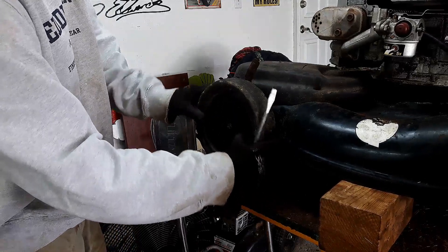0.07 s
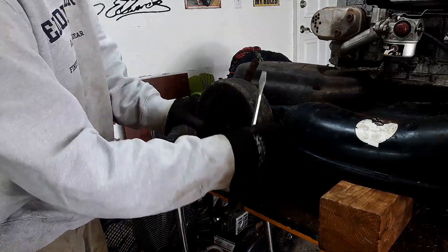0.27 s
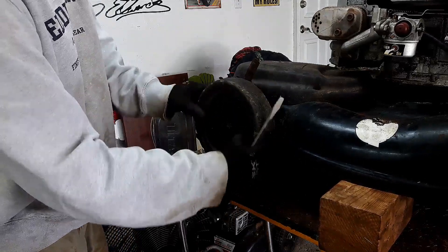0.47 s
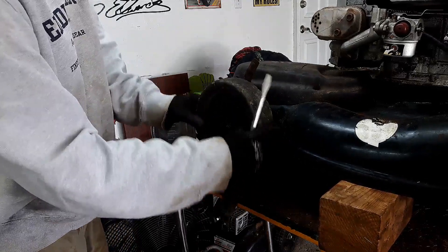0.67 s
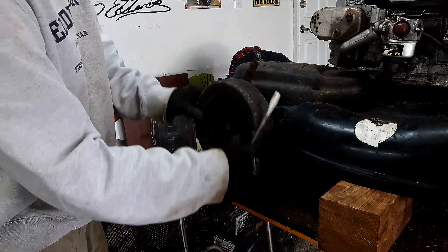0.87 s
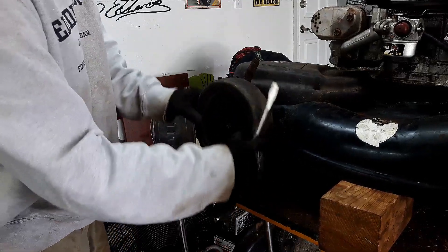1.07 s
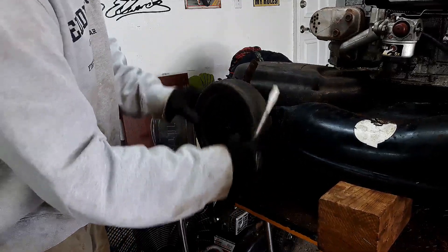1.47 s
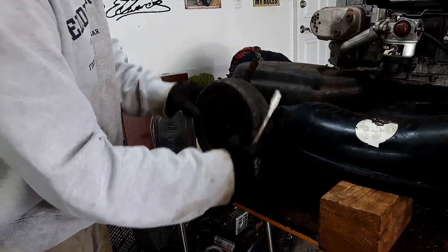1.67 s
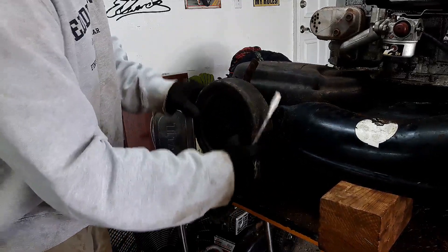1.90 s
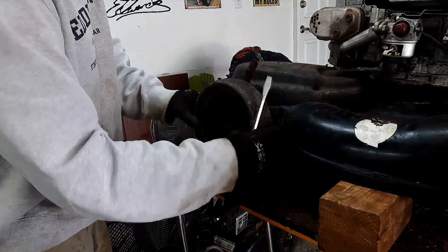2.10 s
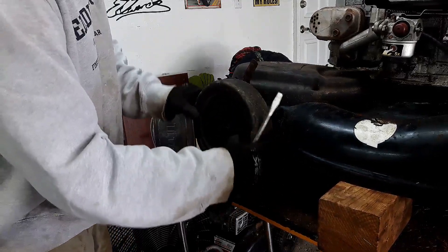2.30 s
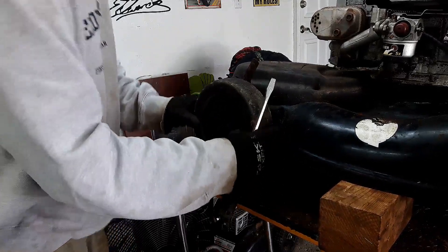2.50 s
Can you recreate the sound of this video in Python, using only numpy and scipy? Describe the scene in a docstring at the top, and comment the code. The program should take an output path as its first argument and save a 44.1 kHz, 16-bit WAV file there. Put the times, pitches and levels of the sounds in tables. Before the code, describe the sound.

A small lawnmower wheel squeaks and knocks as it is worked back and forth in a small workshop. Very short, high squeaks come irregularly from 0.2 to 2.5 seconds over a low rolling rumble. The loose hub clacks and thuds against the hollow body throughout, hardest around 0.5, 0.8, 1.6, 1.8 and 2 seconds. From about 1.4 seconds, the bearing adds faint, thin whistles.

```python
"""A small lawnmower wheel squeaks on its dry axle as a hand works it to and fro on a workbench.
The axle sticks and slips, making short scoops of pitch. The loose hub hits its stop with a clack
and shakes the mower's hollow body, the deck. The wheel rumbles in between, and later its bearing
adds a faint whistle. All this is heard almost in mono, in a small workshop with hard walls."""
import sys
import numpy as np
from scipy import signal
from scipy.fft import rfft, irfft, next_fast_len
from scipy.io import wavfile
from scipy.ndimage import map_coordinates

SR = 44100
rng = np.random.default_rng(int(sys.argv[2]) if len(sys.argv) > 2 else 0)


def materialize(psi):
    """Save the field psi as 16-bit PCM at rate SR to the path in sys.argv[1].

    A 1-D psi becomes a single channel; in a 2-D psi each row is a channel.
    """
    bounded = np.clip(np.atleast_2d(psi).T, -1, 1)
    quanta = np.round(bounded * 32767).astype(np.int16)
    wavfile.write(sys.argv[1], SR, quanta)


N = 116865

# Axle squeaks, each gliding through a turning point: (time [s], length [s], place of the turn [0-1],
# start pitch [Hz], turn pitch [Hz], end pitch [Hz], level [dB], swell [dB], overtone boost [dB])
AXLE_SQUEAKS = [ (.166, .024, .45, 4500, 4280, 4000, -51, -5, 0),
                (.197, .016, .45, 4350, 4380, 5500, -41, -4, -4),
                (.432, .064, .45, 5450, 4850, 5650, -36, 13, 3),
                (.450, .044, .4, 4800, 4270, 4650, -38, 0, 5),
                (.486, .017, .5, 8400, 8750, 8500, -35, 2, -20),
                (.666, .036, .36, 5300, 4420, 5700, -26.5, -3, 0),
                (.817, .034, .35, 5400, 4850, 5650, -28.5, 13, -1),
                (.996, .034, .35, 4500, 3200, 3800, -45, 7, -8),
                (1.024, .028, .35, 4700, 5000, 5650, -27, -2, -2),
                (1.108, .024, .4, 5450, 5020, 4850, -28, 2, -6),
                (1.157, .02, .55, 5100, 4050, 4550, -37, -2, -6),
                (1.174, .023, .45, 4850, 5150, 5850, -26, -2, -2),
                (1.317, .013, .4, 5050, 5030, 5030, -44, 0, 0),
                (1.542, .054, .42, 4450, 3250, 4950, -39.5, 9, 0),
                (1.586, .016, .4, 4900, 5450, 5650, -33, 0, 0),
                (1.710, .046, .55, 5150, 4420, 4520, -31, -5, 0),
                (1.736, .021, .4, 4900, 5200, 5700, -30, 0, 2),
                (1.879, .02, .5, 4800, 3900, 3250, -42.5, -6, -6),
                (1.955, .028, .3, 4700, 5050, 5600, -31, -5, 0),
                (2.135, .032, .4, 2700, 3000, 3900, -51, 2, -6),
                (2.166, .017, .45, 5150, 5300, 5350, -36, 0, -4),
                (2.302, .033, .25, 3650, 4050, 4500, -42, 2, -6),
                (2.420, .083, .6, 3420, 3230, 3900, -34.5, 6, 2),
                (2.488, .016, .5, 4450, 4750, 4800, -39.5, -3, -8)]
# Tone colour of a squeak's overtones: (frequency [Hz], relative level [dB])
OVERTONE_COLOUR = [(5000, -14), (6700, 3), (7700, -9.5), (8700, 0), (9700, -10), (10700, -11), (11900, -19),
                   (13200, -8), (15000, -5.5)]
# Tone colour of the axle's scratching: (frequency [Hz], relative level [dB])
SCRATCH_COLOUR = [(1500, 6), (3200, 4.5), (4300, 32), (5500, -2), (6500, -45), (15000, -31)]
# Hub knocks: (time [s], thud level [dB], clack level [dB], chatter rate [Hz], rim pitch [Hz])
HUB_KNOCKS = [ (.204, -33, -47.5, 219.4, 905), (.234, -29.5, -56, 223.3, 460),
              (.249, -25, -55.5, 236.6, 850), (.411, -35, -40, 238, 860), (0.491, -17.5, -47, 240.5, 443),
              (0.674, -29.5, -36, 267, 830), (0.702, -29.5, -32.5, 234, 820), (0.731, -29, -50, 223.7, 604),
              (.846, -15, -24.5, 229.2, 567), (0.917, -32, -49, 238.5, 910),
              (1.007, -27.5, -37.5, 238.4, 1520), (1.041, -26.5, -27, 254.4, 920),
              (1.055, -25, -29.5, 250, 1640), (1.146, -30.5, -49, 220.8, 520),
              (1.401, -27.5, -44, 237, 810), (1.518, -30, -42, 218, 810), (1.597, -13.5, -28.5, 215, 830),
              (1.605, -21, -48, 245, 764), (1.623, -35, -38, 198, 550), (1.640, -25.5, -32.5, 252.4, 1020),
              (1.756, -15.5, -33.5, 243.8, 680), (1.809, -35, -34.5, 226.5, 730),
              (1.983, -15.5, -28.5, 232.9, 990), (2.054, -29, -40, 230, 560), (2.132, -32, -34.5, 243, 970),
              (2.322, -24.5, -27.5, 233, 990), (2.332, -24, -43, 238.3, 490),
              (2.372, -32.5, -41, 253.5, 520)]
# The quick taps that make up one knock: (relative strength [0-1])
CHATTER_TAPS = [.45, .9, 1, .9, .55]
# Tone colour of the hollow deck: (frequency [Hz], relative level [dB])
DECK_COLOUR = [(30, -27), (70, -7.5), (130, -18.5), (190, 1), (290, 2.5), (360, -10.5), (450, -3.5),
               (530, -1), (660, -19.5), (1600, -36), (4000, -105)]
# Tone colour of the hub's clack: (frequency [Hz], relative level [dB])
CLACK_COLOUR = [(50, -30), (500, 9), (1000, 6.5), (1350, 2), (2400, -6.5), (3500, -20), (6500, -65)]
# How loudly the wheel rolls: (time [s], relative level [dB])
ROLL_LEVELS = [(0, -33.5), (.1, -41), (.19, -37), (.27, -28), (0.359, -38), (0.546, -27), (0.651, -36),
               (.79, -30.5), (1.12, -31), (1.348, -35), (1.49, -35), (1.619, -26.5), (1.92, -33.5),
               (2.25, -33.5), (2.38, -31), (2.65, -38.5)]
# Tone colour of the rolling wheel: (frequency [Hz], relative level [dB])
RUMBLE_COLOUR = [(30, -21.5), (130, -0.5), (210, 4.5), (350, -5.5), (480, -4.5), (640, -9.5), (1000, -17),
                 (2000, -29.5), (15000, -58)]
# Bearing whistles: (time [s], length [s], pitch [Hz], rise [share of pitch], base tone level [dB])
BEARING_WHISTLES = [(1.411, 0.041, 7440, 0.015, -65), (1.462, 0.058, 9250, 0.011, -62),
                    (1.643, 0.074, 7440, 0.028, -65), (1.773, 0.067, 9550, 0.064, -58),
                    (1.986, 0.017, 7450, 0.017, -56.5), (2.038, .06, 9410, 0.054, -57),
                    (2.216, 0.058, 7530, 0.019, -60.5), (2.325, 0.041, 9360, 0.072, -57)]
# Tone colour of the workshop air: (frequency [Hz], relative level [dB])
AIR_COLOUR = [(45, -10), (72, 24.5), (110, 0), (220, -12.5), (2500, -15.5), (6000, -36), (15000, -25.5)]
# How long the workshop rings: (frequency [Hz], time to fade by 60 dB [s])
ROOM_FADE = [(100, 0.24), (250, 0.5), (1000, 0.3), (5000, 0.36), (15000, 0.14)]
# The part of the sound that sets left apart from right: (frequency [Hz], relative level [dB])
STEREO_WIDTH = [(30, -22), (200, -70.5), (1300, -19), (2800, -12.5), (5000, -36), (12000, -13.5)]


def axle_squeaks():
    """The dry axle sticks and slips: the pitch mostly dips, then climbs as the hub binds."""
    out = np.zeros(N)
    for start, length, turn, start_hz, turn_hz, end_hz, db, swell_db, boost_db in AXLE_SQUEAKS:
        t = np.arange(int(length * SR)) / SR
        progress = t / length
        into_turn = np.maximum(1 - progress / turn, 0) ** 1.7
        out_of_turn = np.maximum((progress - turn) / (1 - turn), 0) ** 1.36
        hz = turn_hz + (start_hz - turn_hz) * into_turn + (end_hz - turn_hz) * out_of_turn
        roughness = 2 if db < -40 and turn_hz < 4000 else 1  # weak, low squeaks are the roughest
        hz *= 1 + roughness * .021 * wobble(len(t), rate=650)
        phase = 2 * np.pi * np.cumsum(hz) / SR
        hiss = .28 * rng.standard_normal(len(t))
        overtones = rasping(2 * phase, depth=.6) + .5 * rasping(3 * phase, depth=.6)
        overtones = coloured(overtones + hiss, OVERTONE_COLOUR)
        tone = rasping(phase, depth=roughness * .33) + amp(boost_db - 25.5) * overtones
        scratch = coloured(rng.standard_normal(len(t)), SCRATCH_COLOUR)
        level_db = db + swell_db * (progress - .5) + 2.6 * wobble(len(t), rate=227.3)
        sound = tone * amp(level_db) + scratch * amp(.5 * level_db - 42)
        fade = np.clip(np.minimum(t, length - t) / .004, 0, 1)  # 4 ms at each end
        sound *= np.sin(np.pi / 2 * fade) ** 2
        add(out, start, in_room(off_walls(sound), echo_db=-10))
    return out


def rasping(phase, depth):
    """A rough tone: the axle's slips vary in strength and timing."""
    strength = wobble(len(phase), rate=1000) * np.sin(phase)
    timing = wobble(len(phase), rate=1000) * np.cos(phase)
    return (np.sin(phase) + depth * (strength + timing)) / np.sqrt(1 + 2 * depth ** 2)


def hub_knocks(scatter_s=.00028, clack_fade_s=.083):
    """The hub hits its stop with a clack and chatters a few times against the hollow deck."""
    out = np.zeros(N)
    t = np.arange(SR // 8) / SR
    for start, thud_db, clack_db, chatter_hz, rim_hz in HUB_KNOCKS:
        taps = np.zeros(len(t))
        for k, strength in enumerate(CHATTER_TAPS):
            add(taps, k / chatter_hz + scatter_s * rng.standard_normal(), np.array([strength]))
        thud = coloured(taps, DECK_COLOUR) * np.sqrt(SR / chatter_hz)
        burst = rng.standard_normal(len(t)) * amp(-60 * t / clack_fade_s)
        clack = coloured(burst, CLACK_COLOUR)
        add(out, start, in_room(amp(thud_db) * through_rim(thud, rim_hz), echo_db=-7))
        add(out, start, in_room(amp(clack_db) * through_rim(clack, rim_hz), echo_db=-7))
    return out


def through_rim(x, hz, width_hz=236, ring_db=-1.5):
    """The rim rings along with a knock, at a pitch that depends on where it is struck."""
    ring = signal.lfilter(*signal.iirpeak(hz, hz / width_hz, SR), x)
    return x + amp(ring_db) * ring


def wheel_rumble(gain_db=-4):
    """The turning wheel rumbles unevenly through the deck."""
    level_db = np.interp(np.arange(N) / SR, *np.transpose(ROLL_LEVELS)) + gain_db
    bumps = rng.standard_normal(N) * amp(wobble(N, rate=82))
    bumps /= np.sqrt(np.mean(bumps ** 2))
    return coloured(bumps * amp(level_db), RUMBLE_COLOUR)


def bearing_whistles(octave_db=8.5):
    """The bearing gives faint, slightly rising whistles, low and high in turn."""
    out = np.zeros(N)
    for start, length, hz, rise, db in BEARING_WHISTLES:
        progress = np.linspace(0, 1, int(length * SR))
        glide = progress - .5 + .28 * wobble(len(progress), rate=450)
        phase = 2 * np.pi * np.cumsum(hz * (1 + rise * glide)) / SR
        tone = np.sin(phase) + amp(octave_db) * np.sin(2 * phase)
        swell = np.sqrt(abs(np.sin(np.pi * progress)))
        add(out, start, in_room(amp(db) * tone * swell, echo_db=-1))
    return out


def off_walls(x, first_s=.001, last_s=.013, gain_db=-4):
    """A sound plus eight quick echoes from the bench and the near walls."""
    echoes = np.zeros(SR // 20)
    echoes[0] = 1  # the direct sound
    for place, strength in rng.random((8, 2)):
        delay = first_s + place * (last_s - first_s)
        add(echoes, delay, amp(gain_db) * np.array([strength - .5]))
    return signal.fftconvolve(x, echoes)


def in_room(x, echo_db, gap_s=.0026):
    """A sound plus the workshop's many echoes, which blur into a fading tail."""
    hz, t, noise = signal.stft(rng.standard_normal(SR // 2), SR, nperseg=256)
    fade = amp(-60 * t / along(ROOM_FADE, hz)[:, None])
    tail = signal.istft(noise * fade, SR, nperseg=256)[1]
    tail *= np.clip(np.arange(len(tail)) / SR / gap_s - 1, 0, 1)
    tail *= amp(echo_db) / np.linalg.norm(tail)
    tail[0] = 1  # the direct sound
    return signal.fftconvolve(x, tail)


def room_air(level_db=-51.5):
    """The workshop air is a quiet, steady, deep noise."""
    return amp(level_db) * coloured(rng.standard_normal(N), AIR_COLOUR)


def amp(db):
    """Turn decibels into a number to multiply by."""
    return 10 ** (np.asarray(db) / 20)


def along(table, hz):
    """Read between a table's rows on a log frequency scale."""
    frequencies, values = np.transpose(table)
    return np.interp(np.log(hz + 1), np.log(frequencies + 1), values)


def wobble(n, rate):
    """A smooth curve of n samples through `rate` random points a second."""
    return map_coordinates(rng.standard_normal(4096), [np.arange(n) * rate / SR], mode="wrap")


def add(track, start, sound):
    """Mix a sound into the track, `start` seconds in."""
    part = track[max(round(start * SR), 0):][:len(sound)]
    part += sound[:len(part)]


def coloured(x, colour):
    """Give x a tone colour, with a filter that keeps the power of white noise the same."""
    size = 2 * next_fast_len(len(x) // 2 + 4096)
    cepstrum = irfft(np.log(amp(along(colour, np.fft.rfftfreq(size, 1 / SR)))))
    # Folding onto the first half makes the filter ring after a tap, never before it.
    cepstrum[1:size // 2] *= 2
    cepstrum[size // 2 + 1:] = 0
    response = np.exp(rfft(cepstrum))
    response /= np.sqrt(np.mean(abs(response) ** 2))
    return irfft(rfft(x, size) * response)[:len(x)]


def scene():
    """Mix the wheel and the air; a trace of scattered sound sets left apart from right."""
    mid = axle_squeaks() + hub_knocks() + wheel_rumble() + bearing_whistles() + room_air()
    size = next_fast_len(N + SR // 2)
    scatter = rng.standard_normal(SR // 20) * np.linspace(1, 0, SR // 20) ** 2
    scatter /= np.linalg.norm(scatter)
    width = amp(along(STEREO_WIDTH, np.fft.rfftfreq(size, 1 / SR)))
    side = irfft(rfft(mid, size) * rfft(scatter, size) * width, size)[:N]
    return np.array([mid + side, mid - side])


def record(dry, top_hz=15900):
    """Cut away the very highest treble."""
    size = next_fast_len(N + SR // 2)
    kept = np.fft.rfftfreq(size, 1 / SR) < top_hz
    return irfft(rfft(dry, size) * kept, size)[:, :N]


dry = scene()
out = record(dry)
materialize(out)
```